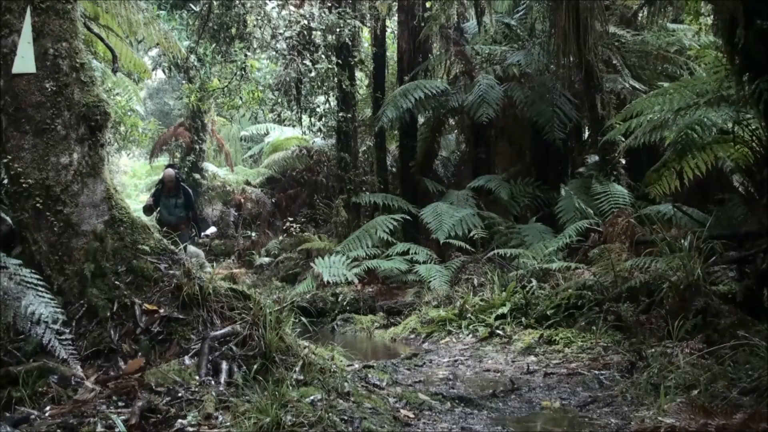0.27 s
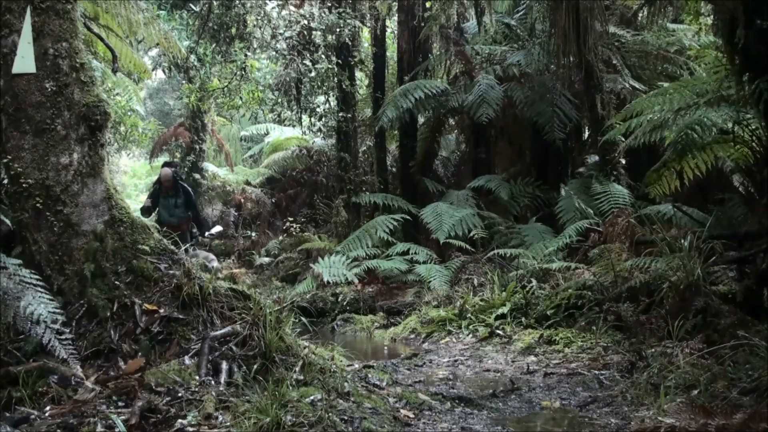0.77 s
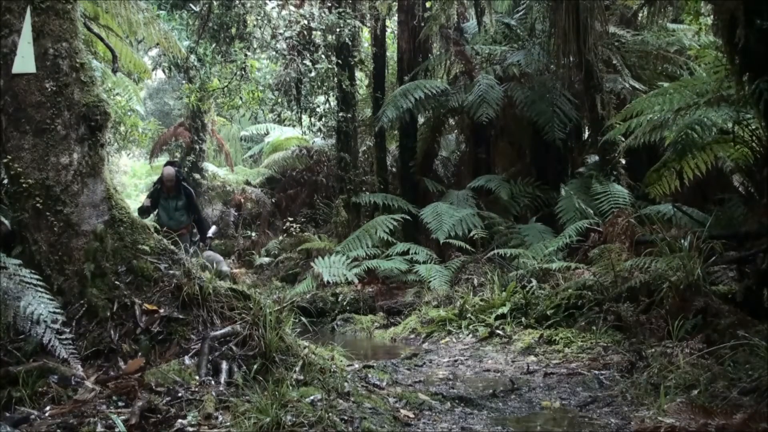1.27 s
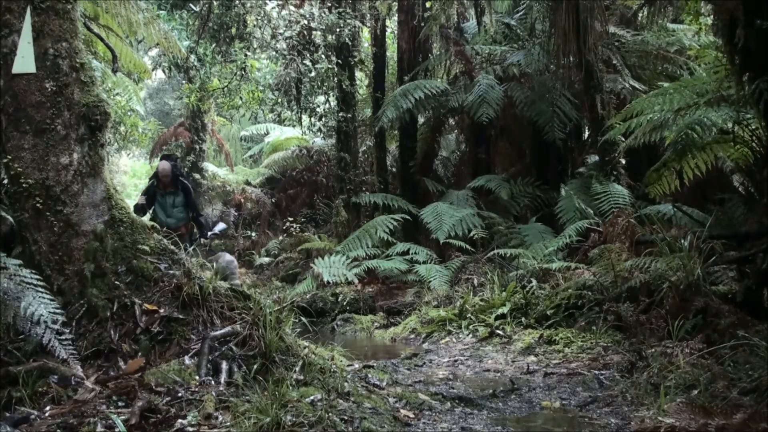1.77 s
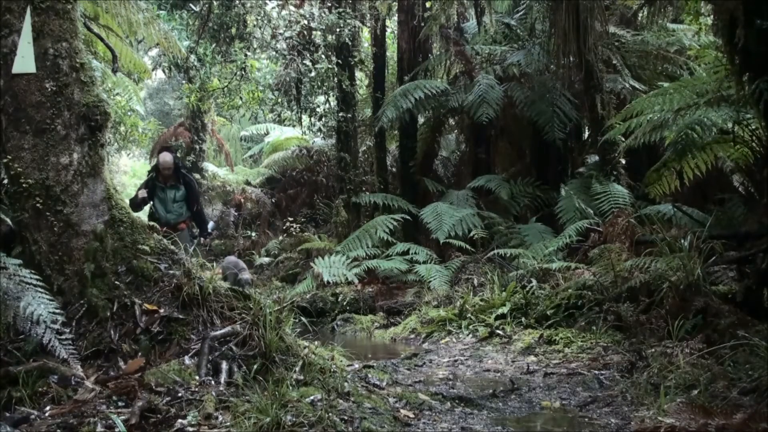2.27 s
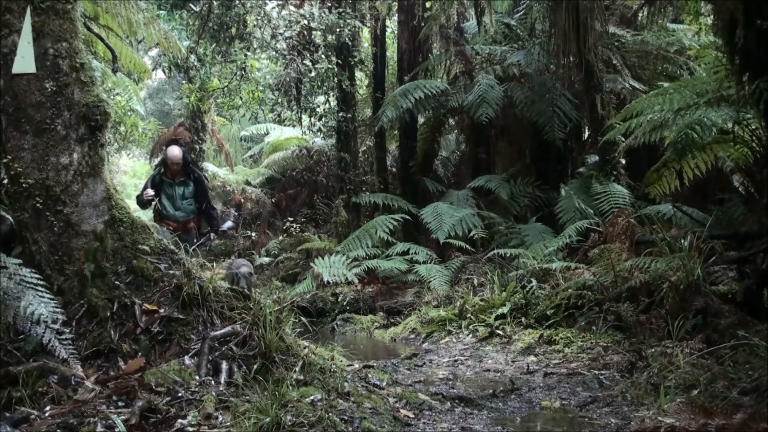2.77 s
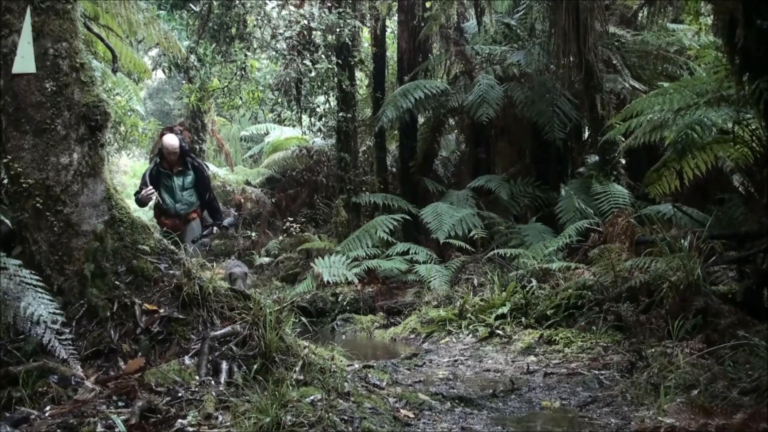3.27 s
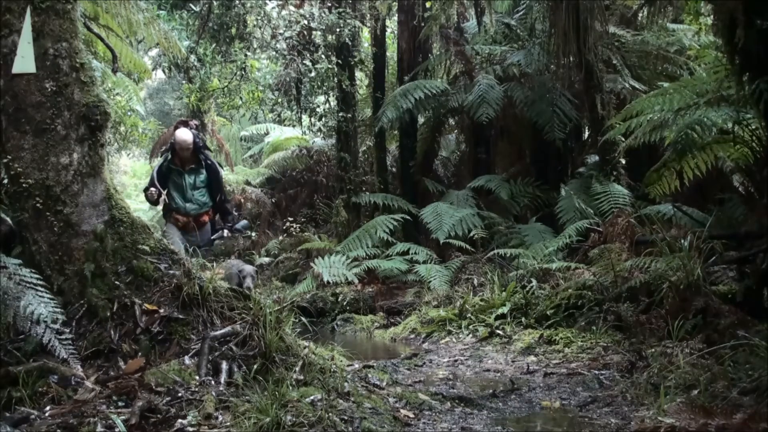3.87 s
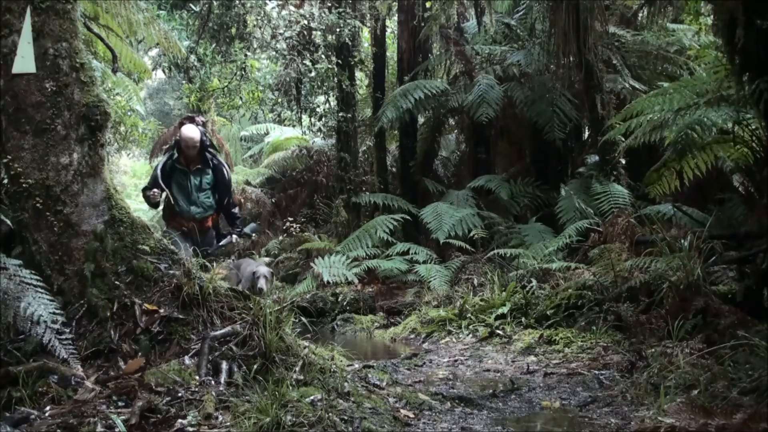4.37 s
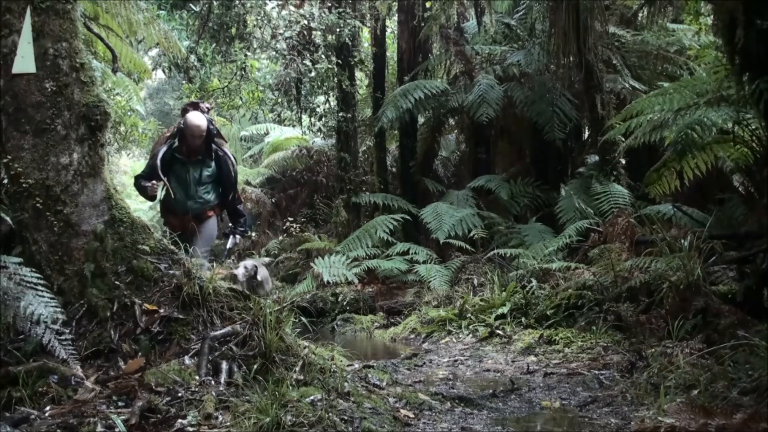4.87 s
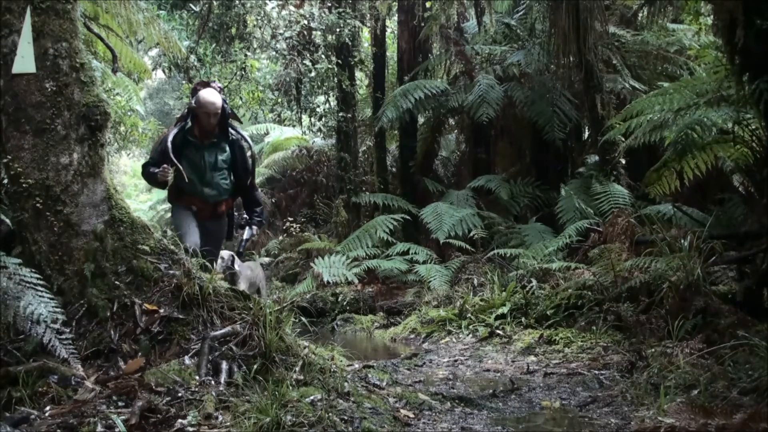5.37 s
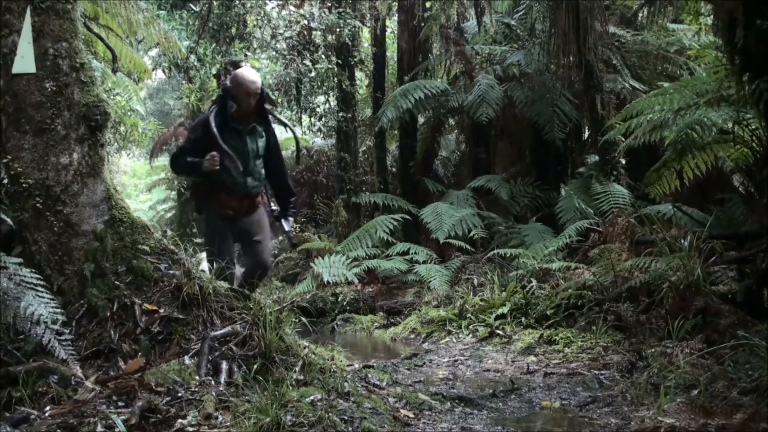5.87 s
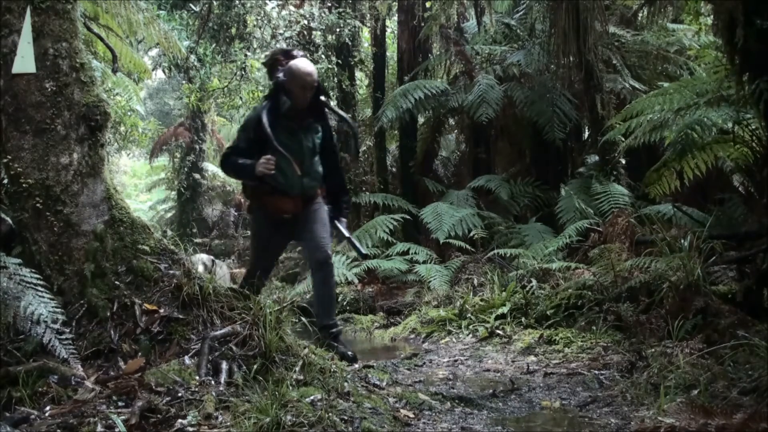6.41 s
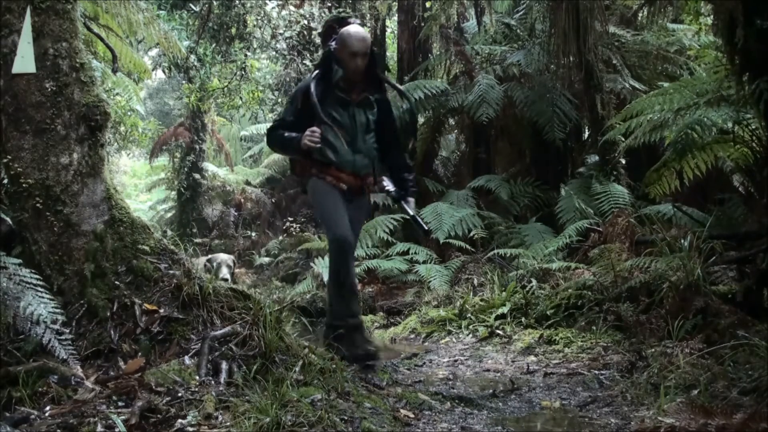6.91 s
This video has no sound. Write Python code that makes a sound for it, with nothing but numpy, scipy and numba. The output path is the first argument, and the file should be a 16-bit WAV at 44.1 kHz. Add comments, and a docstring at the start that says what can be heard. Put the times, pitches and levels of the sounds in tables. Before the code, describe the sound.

Steady rain patters on fern leaves and litter with sharp close drops, while a walker's wet fronds rustle, gear squeaks faintly, and a boot finally thuds.

```python
"""Steady rain on a fern forest: a far wash of countless drops over a faint low hum, near drops on leaves and litter.
A soft footfall comes early; wet fronds brushed by a walker rustle in filtered noise bursts, and his gear
squeaks in short falling tones. The rain bed and hum dip at 1.15 s and 3.23 s, on heavy drops, and creep back.
Near the end a boot thuds on soft ground as damped low rings and a rumble."""
import sys
import numpy as np
from scipy import signal
from scipy.fft import rfft, irfft, next_fast_len
from scipy.io import wavfile
from scipy.ndimage import uniform_filter1d
from numba import njit

SR = 44100
rng = np.random.default_rng(int(sys.argv[2]) if len(sys.argv) > 2 else 0)


def output_pcm(signal):
    """Save a mono or channel-first signal as 16-bit PCM at the path in sys.argv[1].

    Samples are clipped to [-1, 1] before scaling.
    """
    pcm = np.clip(np.atleast_2d(signal).T, -1, 1) * 32767
    wavfile.write(sys.argv[1], SR, np.round(pcm).astype(np.int16))


N = 315136  # samples

# Level curve shared by the wash, hum and patter: time_s, level_db
BED_LEVEL = [(0, -40.5), (.65, -39), (1.143, -39.5), (1.15, -43.5), (1.6, -43.5), (2.0, -42), (3.0, -39),
             (3.226, -39), (3.234, -41), (3.5, -41.5), (3.75, -39.5), (4.18, -40), (4.3, -38), (5.0, -38),
             (7.146, -37.5)]
# Relative spectrum of the far rain: frequency_hz, density_db
WASH_SPECTRUM = [(18, -40), (30, -46), (59, -14), (144, -5.5), (467, -1), (6540, 2), (7860, 0.5),
                 (10700, -8.5), (11900, -7.5), (15500, -12)]
# Stereo width of the far rain: frequency_hz, side_minus_mid_db
WASH_WIDTH = [(40, -2), (150, -10.5), (700, -9), (1300, -11), (4400, -15), (9000, -13), (10800, -3),
              (11500, -97)]
# Big near drops: start_s, ring_peak_db, ring_hz, ring_cycles, tick_peak_db, left_minus_right_db
BIG_DROPS = [(0.027, -19, 2240, .7, -35, 3), (0.1093, -20, 3400, 1.1, -35, 0),
             (0.1842, -32.5, 400, 1, -18, 0), (0.2257, -36.5, 300, 2.1, -35, -1),
             (0.2594, -19, 5910, 1.2, -35, -2), (0.4266, -38, 280, 1.1, -35, 0),
             (0.4351, -18, 11820, 2.1, -35, 0), (0.6363, -27, 420, 0.5, -35, -2),
             (0.7322, -34.5, 375, 2.8, -17, 0), (0.8737, -30, 2570, 4, -24, 4),
             (1.0373, -20, 7800, 2.1, -35, -1), (1.1437, -14.5, 2600, 1.9, -16, 5.5),
             (1.1954, -33, 600, 0.58, -26, 0), (1.2146, -17, 6600, 2.7, -28, 2),
             (1.3404, -24, 2570, .9, -35, -3), (1.4677, -22.5, 3400, 1.1, -37, 6),
             (1.632, -27, 3450, 3.3, -35, 0), (1.6697, -26, 3900, 1.8, -35, 3),
             (1.803, -21, 5150, 1.3, -35, -2), (1.9155, -18, 7800, 1.1, -22, -3),
             (1.9228, -42, 372, 5, -17, 0), (1.9603, -36.5, 382, 2.1, -18, 0),
             (2.0278, -27, 850, .76, -35, 0), (2.0515, -16, 3900, 1.1, -35, 0),
             (2.0684, -14.5, 3000, .78, -35, 2.5), (2.1645, -23, 1690, 1.3, -35, 4),
             (2.31, -36, 560, 1.1, -18, 0), (2.3783, -17.5, 8750, 4, -35, 3),
             (2.4009, -15, 2690, 2.2, -30, 5), (2.4165, -22, 2960, 2.1, -35, 1),
             (2.4308, -35.5, 490, 4, -35, 1), (2.5582, -19.5, 2240, 1, -16.5, 6),
             (2.7002, -24.5, 1720, 1.1, -35, 4), (2.7794, -22, 2960, 1.2, -35, 0),
             (2.7968, -21, 1950, .9, -35, -1), (2.843, -17.5, 1760, 1.4, -35, 3),
             (2.9185, -20, 4480, 1.1, -35, 0), (3.0543, -33, 740, 1.06, -16, -2),
             (3.1704, -24, 2640, 4, -35, 4), (3.2282, -10.5, 3500, 0.68, -14, -1),
             (3.26, -20, 2980, 3.6, -35, 2), (3.3957, -21, 1200, 0.63, -35, 0),
             (3.4439, -23.5, 1100, .69, -17, 3), (3.5295, -25.5, 640, 0.68, -35, 0),
             (3.6206, -22.5, 980, 1.1, -35, 1), (3.6772, -22, 1950, 4.4, -25, 0),
             (3.6954, -25, 4480, 4, -35, -7), (3.7008, -24, 1950, 2.7, -25, -1),
             (3.9414, -25, 1120, 1.5, -35, 0), (3.9498, -15.5, 2700, 4.9, -30, 5.5),
             (4.0656, -17.5, 5100, 2.1, -35, 4), (4.1092, -26.5, 2300, 4, -14, 2),
             (4.2195, -22, 1800, 2.7, -17, 0), (4.2248, -17, 3920, 2.1, -35, -3),
             (4.2303, -18, 4520, 4.6, -35, -3), (4.2999, -23, 4480, 4, -35, 0),
             (4.3911, -19, 5910, 4, -35, -4), (4.4337, -20, 1950, .92, -35, -5),
             (4.4864, -10.5, 7800, 2, -30, 3), (4.5013, -19.5, 1950, 2.8, -13, 5),
             (4.63, -16, 3900, 1.1, -35, -4), (4.7705, -28, 3400, 2.1, -35, -1),
             (4.78, -26, 2300, 1.2, -26, 0), (4.7866, -21, 2200, .9, -11.5, 0),
             (4.805, -34, 490, 2.6, -16, -1), (4.9054, -17.5, 5910, 2.4, -35, -2),
             (4.9212, -33, 320, 1.2, -35, 0), (4.9659, -13, 1710, 2.9, -30, 2.5),
             (4.9727, -24, 1700, 4.4, -35, 3), (4.983, -28, 560, 1.2, -28, -1),
             (5.056, -26, 1480, 1.2, -17, -2), (5.1083, -27.5, 980, 1.1, -35, 2),
             (5.1385, -16.5, 1120, 0.46, -35, -2), (5.2726, -17, 8960, 1.1, -35, 0),
             (5.2776, -16.5, 5150, 3.6, -35, 6), (5.4009, -18, 5150, 1.5, -35, 6),
             (5.4721, -16.5, 5910, 3.1, -35, 3), (5.6831, -22, 2000, 1.5, -35, 3),
             (5.7392, -19, 3900, 1.1, -35, 7), (5.8315, -34, 690, 4.6, -35, -2),
             (5.89, -14.5, 3900, 1.1, -35, -1), (6.0802, -24, 2230, 3, -42, 3),
             (6.1147, -28.5, 716, 4.2, -35, 0), (6.1405, -16.5, 5760, 1.8, -35, 6),
             (6.1517, -13, 7800, .83, -35, 5), (6.2546, -14, 1950, .66, -35, 3),
             (6.3255, -20, 5100, 3.2, -35, -1), (6.332, -18, 3900, 1.1, -35, -1),
             (6.3723, -13.5, 3130, 2.1, -30, 3), (6.3877, -22, 3000, 2.1, -35, 0),
             (6.4768, -13, 2980, 2.2, -30, 3), (6.4843, -31, 450, 1.7, -20, 0),
             (6.5482, -15, 7360, 3.6, -35, 2), (6.5552, -22.5, 1280, 1.9, -20, 0),
             (6.625, -30, 800, 1.1, -24, 0), (6.584, -25.5, 560, 0.74, -14.5, 1),
             (6.6837, -15, 4000, 0.79, -35, 1), (6.8305, -20.5, 3400, 4, -35, 4),
             (6.8402, -14, 2960, 1.7, -30, 2), (6.8581, -18, 2960, 2.4, -35, 0),
             (6.88, -16, 5250, 3, -35, 6), (7.0174, -18, 5150, 1.1, -35, 0)]
# Droplets thrown off a big drop: typical_delay_s, level_below_drop_db
SPLASH_DROPLETS = [(.003, -11), (.009, -12)]
# Steps on soft ground: start_s, level_db, extra_bass_db
STEPS = [(7.0205, -23, 1.5), (7.123, -41, 18.5), (0.22, -40, 8)]
# Resonances of the ground, lowest first: frequency_hz, level_db, t60_s
GROUND_MODES = [(70, -13, .09), (160, -17, .05), (400, 0, .022), (520, -12, .04)]
# Wet fronds brushed aside: peak_s, rise_s, fall_s, level_db, centre_hz
FROND_BRUSHES = [(3.70, 0.02, 0.035, -33.5, 4500), (4.22, .003, 0.072, -36.5, 4600),
                 (4.49, .01, 0.039, -41, 7000), (4.94, 0.013, 0.035, -35.5, 5500),
                 (5.62, 0.0037, 0.063, -34.5, 5100), (5.722, 0.03, 0.048, -33.5, 3000),
                 (3.11, .03, .06, -45.5, 2200), (6.565, 0.03, 0.06, -41, 1200),
                 (6.85, 0.02, .02, -43, 3900), (0.88, 0.013, .02, -38, 2500),
                 (0.68, 0.014, 0.015, -48, 1400), (2.44, .02, 0.042, -40.5, 4000),
                 (3.32, .01, 0.022, -39.5, 9000)]
# Falling gear squeaks: start_s, length_s, start_hz, end_hz, level_db
GEAR_SQUEAKS = [(2.089, .058, 2400, 1336, -43), (3.067, 0.0364, 2203, 1640, -34.5),
                (3.877, .02, 1550, 1510, -41), (5.71, 0.0508, 2194, 1496, -34.5),
                (5.79, 0.029, 887, 850, -38.5), (6.456, 0.023, 2090, 1750, -34)]

HUM_HZ, HUM_DB = 70.2, -27.5  # mean pitch; level relative to the bed curve
TICK_HZ, TICK_CYCLES = 6600, 1.43  # sharp impact tick, alike for all big drops
SPRAY_S, SPRAY_DB = .002, -11  # scale of the spray delay; level below the louder of tick and ring
TOP_HZ = 15850  # upper edge of the whole mix


def undb(db):
    """Turn decibels into an amplitude factor."""
    return 10 ** (np.asarray(db) / 20)


def unit(x):
    """Scale to an rms of 1."""
    return x / np.sqrt(np.mean(x ** 2))


def on_log(hz, table):
    """Read a (frequency, value) table on a log-frequency axis."""
    table_hz, value = np.transpose(table)
    return np.interp(np.log(np.maximum(hz, 1)), np.log(table_hz), value)


def walk(rate_hz):
    """Random levels held for one period of the rate, smoothed twice, rms 1."""
    hold = int(SR / rate_hz)
    steps = np.repeat(rng.standard_normal(N // hold + 1), hold)
    smooth = uniform_filter1d(uniform_filter1d(steps, hold), hold)
    return unit(smooth[:N])


def band(hz, width_hz, size):
    """Noise through one resonance, rms 1."""
    b, a = signal.iirpeak(min(hz, SR / 2.5), hz / width_hz, SR)
    return unit(signal.lfilter(b, a, rng.standard_normal(size)))


@njit
def ring(start, hz, t60, left, right, size, rise):
    """Damped rings that swell as contact fades, with a time constant of rise cycles."""
    out = np.zeros((2, size))
    for k in range(len(start)):
        turn = np.exp(2j * np.pi * hz[k] / SR - np.log(1000.) / (t60[k] * SR))
        release = np.exp(-hz[k] / (rise * SR))
        swing, contact = 1. + 0j, 1.
        for i in range(start[k], min(size, start[k] + int(t60[k] * SR) + 1)):
            out[0, i] += left[k] * swing.real * (1 - contact)
            out[1, i] += right[k] * swing.real * (1 - contact)
            swing *= turn
            contact *= release
    return out


def strike(start_s, db, hz, t60, pan_db, rise=0.52):
    """Damped rings of random polarity, set by envelope peak and panned by level difference."""
    columns = np.broadcast_arrays(start_s, db, hz, t60, pan_db)
    start_s, db, hz, t60, pan_db = (np.ascontiguousarray(v, float) for v in columns)
    ratio = np.log(1000) * rise / (hz * t60)  # rise time over decay time
    peak = (ratio / (1 + ratio)) ** ratio / (1 + ratio)  # top of the swelling, decaying envelope
    gain = rng.choice([-1., 1.], len(start_s)) * undb(db) / peak
    left, right = gain * undb(pan_db / 2), gain * undb(-pan_db / 2)
    return ring((start_s * SR).astype(np.int64), hz, t60, left, right, N, rise)


def ring_time(hz, cycles):
    """t60 of a ring that falls 20 dB within its cycles, at least 0.3 of one."""
    return 3 * np.maximum(cycles, .3) / hz


def wash():
    """Far drops blur into a hiss: shaped stereo noise whose octave bands flicker separately."""
    size = next_fast_len(N)
    hz = np.arange(size // 2 + 1) * SR / size
    mid, side = rfft(rng.standard_normal((2, size))) * undb(on_log(hz, WASH_SPECTRUM))
    side = side * undb(on_log(hz, WASH_WIDTH))
    left_right = np.array([mid + side, mid - side])
    out, gust = 0, walk(9)
    for centre in 31.25 * 2 ** np.arange(10):
        octaves_away = np.log2(np.maximum(hz, 1) / centre)
        share = np.cos(np.pi / 2 * np.clip(octaves_away, -1, 1)) ** 2
        octave = irfft(share * left_right, size)[:, :N]
        flicker_db = .5 * gust * (centre > 200) + 1.0 * walk(20)  # the gust is common to the upper bands
        out = out + octave * undb(flicker_db)
    return unit(out)


def hum():
    """A low sine that wavers in pitch and level."""
    hz = HUM_HZ * (1 + 0.018 * walk(4.9))
    level = undb(HUM_DB + 2.0 * walk(5.04))
    return level * np.sqrt(2) * np.sin(2 * np.pi * np.cumsum(hz) / SR)


def patter(count, db, spread_db, low_hz, high_hz, cycles, clump):
    """Branches shed drops in random flurries: many small, few large, each ringing at its own pitch."""
    when, pitch, size, place, damp = rng.random((count, 5)).T
    density = np.cumsum(np.exp(clump * walk(16)))  # uneven time gathers drops into flurries
    start_s = np.interp(when, density / density[-1], np.arange(N) / SR)
    hz = low_hz * (high_hz / low_hz) ** pitch
    size_db = db - spread_db * np.log(size + .03)
    t60 = ring_time(hz, cycles * (.5 + damp))
    return strike(start_s, size_db, hz, t60, 1.2 * (place - .5))


def drops():
    """A big drop ticks and rings leaf or litter, bursts into spray and throws weaker droplets nearby in pitch."""
    start_s, db, hz, cycles, tick_db, pan_db = np.transpose(BIG_DROPS)
    out = strike(start_s, db, hz, ring_time(hz, cycles), pan_db)
    out += strike(start_s, tick_db, TICK_HZ, ring_time(TICK_HZ, TICK_CYCLES), pan_db)
    for _ in range(4):  # spray grains per drop
        when, pitch = rng.random((len(start_s), 2)).T
        fine_hz = TICK_HZ * 1.5 ** (2 * pitch - 1)
        spray_s = start_s + SPRAY_S * (.15 + when)
        spray_db = np.maximum(tick_db, db) + SPRAY_DB - 5 * when  # later grains are weaker
        out += strike(spray_s, spray_db, fine_hz, ring_time(fine_hz, 2.3), pan_db)
    for late_s, part_db in SPLASH_DROPLETS:
        when, pitch = rng.random((len(start_s), 2)).T
        near_hz = np.minimum(hz * 1.8 ** (2 * pitch - .7), 14000)
        landing_s = start_s + late_s * (.3 + when)
        out += strike(landing_s, db + part_db, near_hz, ring_time(near_hz, 0.73), pan_db)
    return out


def footfalls():
    """Each step knocks the litter, booms in soft ground and leaves a rumble as the soil settles."""
    start_s, db, bass_db = np.transpose(STEPS)
    out = np.zeros((2, N))
    for k, (hz, mode_db, t60) in enumerate(GROUND_MODES):
        level_db = db + mode_db + bass_db * (k == 0)  # extra bass goes to the lowest mode
        out += strike(start_s, level_db, hz, t60, 0)
    late = np.arange(N) / SR - start_s[:, None]
    fade = (late > 0) * np.exp(-np.abs(late) / 0.073)
    settle = (undb(db + bass_db - 23.5)[:, None] * fade).sum(axis=0)
    return out + settle * band(100, 160, N)


def rustles():
    """Fronds scrape past: swells of broad noise, made grainy by random level steps."""
    out, t = np.zeros(N), np.arange(N) / SR
    for peak_s, rise, fall, db, hz in FROND_BRUSHES:
        near = np.abs(t - peak_s) < .2
        late = t[near] - peak_s
        swell = np.exp(-np.where(late < 0, (late / rise) ** 2, late / fall))
        steps = np.repeat(rng.standard_normal(len(late) // 64 + 1), 64)[:len(late)]
        grain = undb(2.5 * steps)  # shaken droplets
        out[near] += undb(db) * swell * grain * band(hz, 0.79 * hz, len(late))
    return out


def squeaks():
    """Gear squeaks: short tones that slide down, roughened by low noise."""
    out = np.zeros(N)
    for start_s, length, start_hz, end_hz, db in GEAR_SQUEAKS:
        u = np.linspace(0, 1, int(length * SR))
        hz = start_hz * (end_hz / start_hz) ** u ** 0.69
        rough = 1 + 0.68 * band(150, 250, len(u))
        swell = np.sin(np.pi * u ** 0.72)
        tone = np.sin(2 * np.pi * np.cumsum(hz) / SR)
        i = int(start_s * SR)
        out[i:i + len(u)] += undb(db) * swell * rough * tone
    return out


def scatter(x, db, t60):
    """Trunks and fronds return a faint, ragged treble tail; a gentle low-pass softens the very top."""
    t = np.arange(int(t60 * SR)) / SR
    tail = rng.standard_normal((2, len(t))) * np.exp(-np.log(1000) * t / t60)
    tail = tail / np.sqrt(np.sum(tail ** 2, axis=1, keepdims=True))
    stereo = tail[0] + 0.065 * tail[1] * np.array([[1], [-1]])  # mostly alike left and right
    treble = signal.lfilter(*signal.butter(2, 1500, "high", fs=SR), stereo)
    wet = x + undb(db) * signal.fftconvolve(x, treble, axes=1)[:, :N]
    return signal.lfilter(*signal.butter(1, 13000, fs=SR), wet)


def scene():
    """Set the rain bed to its level curve, then add big drops and the walker."""
    time_s, level_db = np.transpose(BED_LEVEL)
    bed = undb(np.interp(np.arange(N) / SR, time_s, level_db))
    far = (undb(1.03) * wash() + hum() * undb([[-.8], [.8]])) * bed  # hum leans right
    near = patter(count=3000, db=4.0, spread_db=3.5, low_hz=2540, high_hz=12200, cycles=0.91, clump=.3)
    near = near + patter(count=1400, db=5.5, spread_db=2.0, low_hz=1100, high_hz=8000, cycles=1.14, clump=.55)
    near = near + patter(count=1500, db=-6, spread_db=2.5, low_hz=346, high_hz=2000, cycles=1.15, clump=.5)
    near = near + patter(count=90, db=15.5, spread_db=1.5, low_hz=6960, high_hz=14000, cycles=2.5, clump=.6)
    leaves = scatter(near * bed + drops(), db=-12, t60=0.095)
    walker = footfalls() + rustles() + squeaks()
    return far + leaves + walker


def record(dry):
    """A steep elliptic low-pass cuts the top of the mix."""
    low_pass = signal.ellip(12, .2, 70, TOP_HZ, fs=SR, output="sos")  # 0.2 dB ripple, 70 dB down
    return signal.sosfilt(low_pass, dry)


dry = scene()
out = record(dry)
output_pcm(out)
```